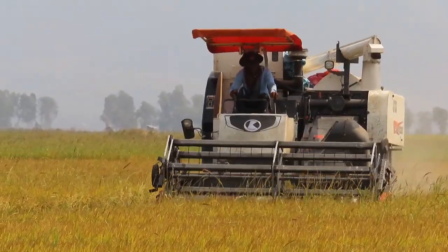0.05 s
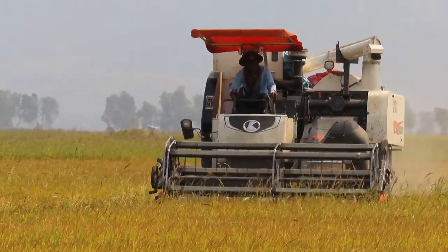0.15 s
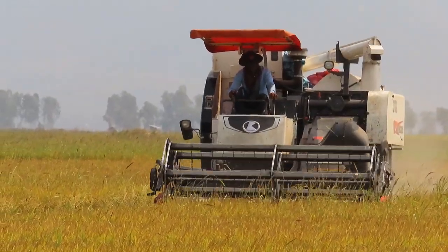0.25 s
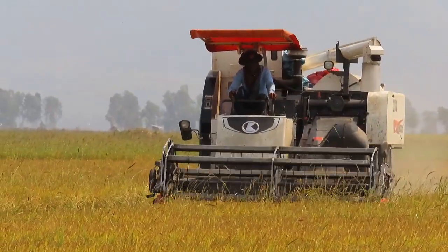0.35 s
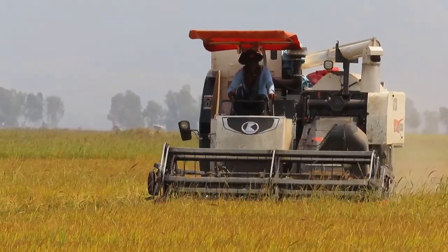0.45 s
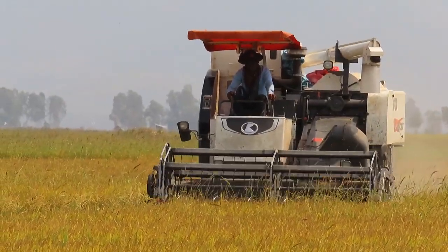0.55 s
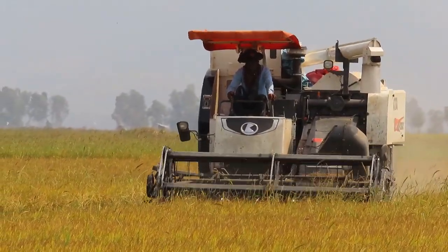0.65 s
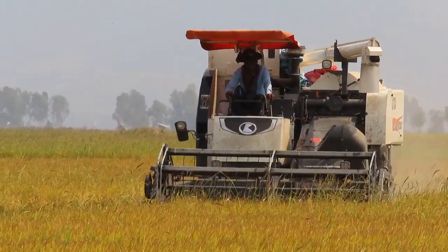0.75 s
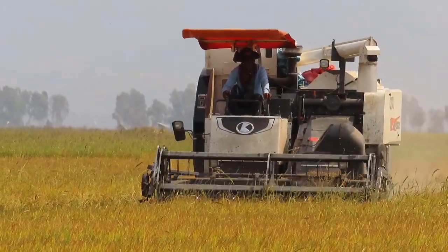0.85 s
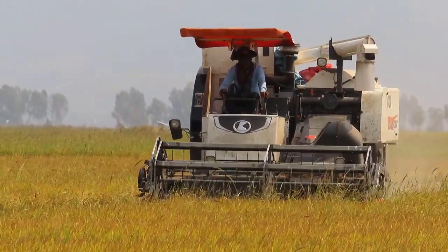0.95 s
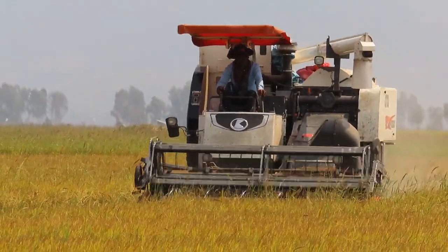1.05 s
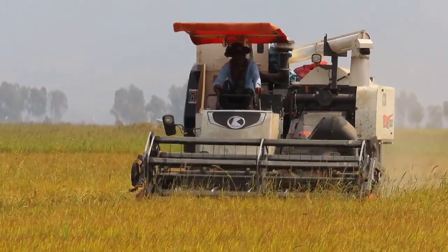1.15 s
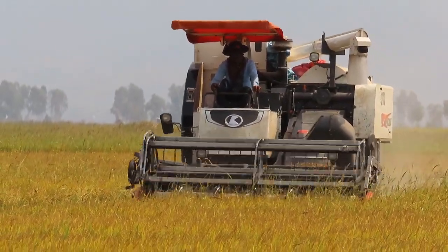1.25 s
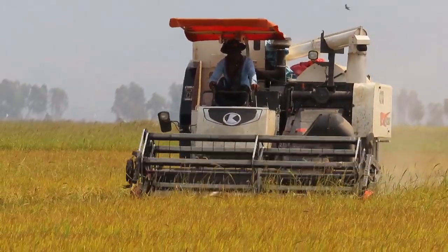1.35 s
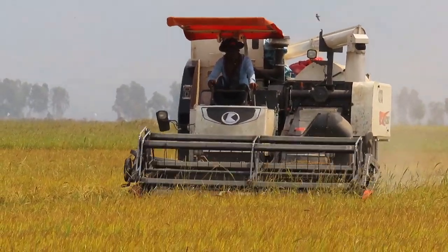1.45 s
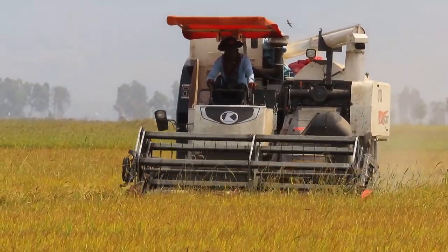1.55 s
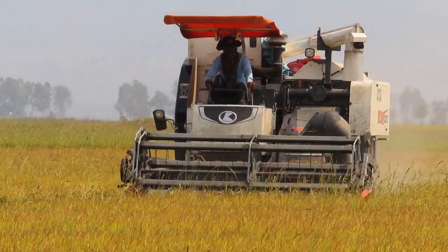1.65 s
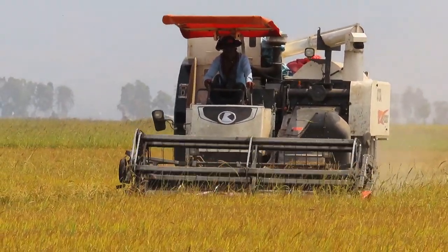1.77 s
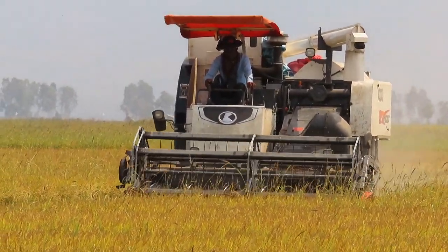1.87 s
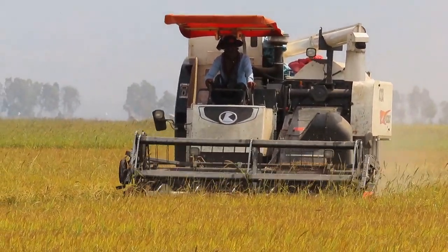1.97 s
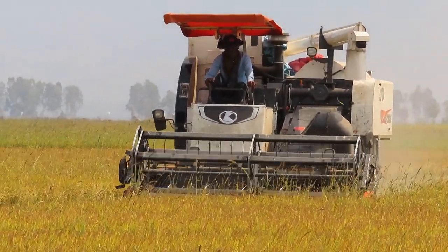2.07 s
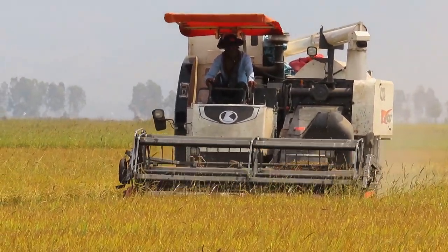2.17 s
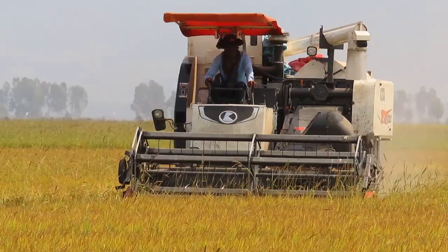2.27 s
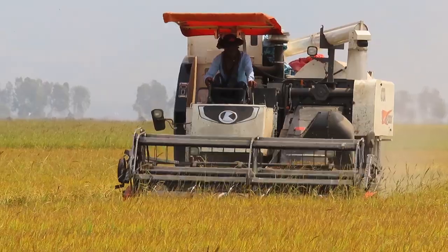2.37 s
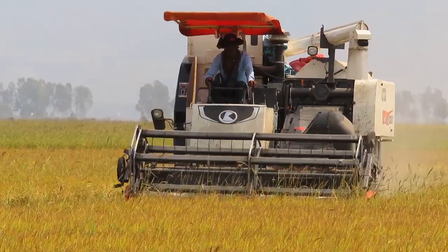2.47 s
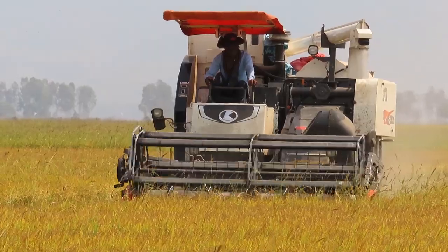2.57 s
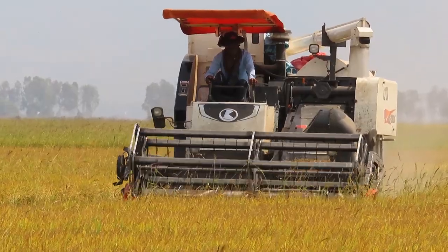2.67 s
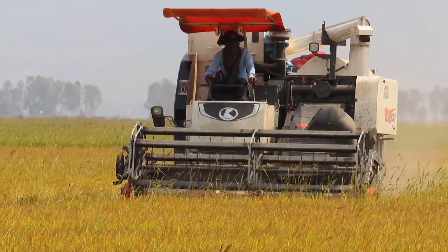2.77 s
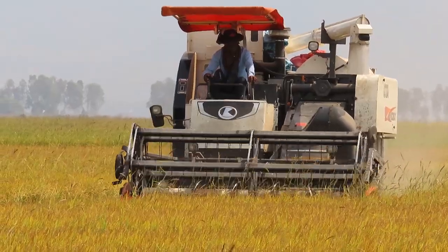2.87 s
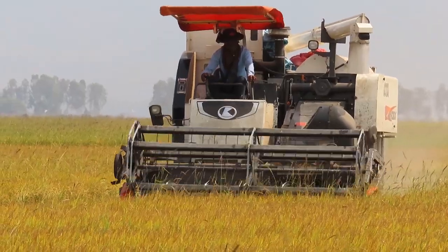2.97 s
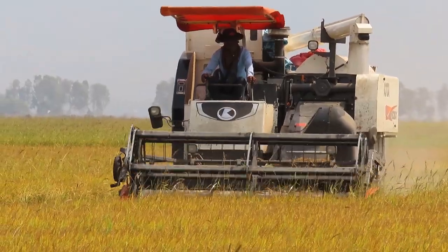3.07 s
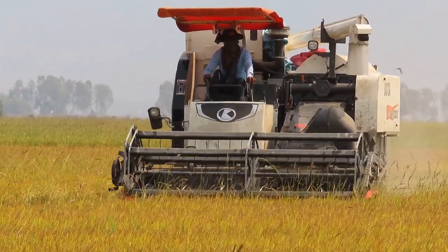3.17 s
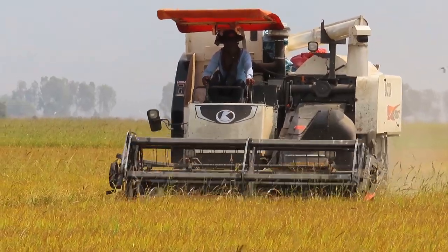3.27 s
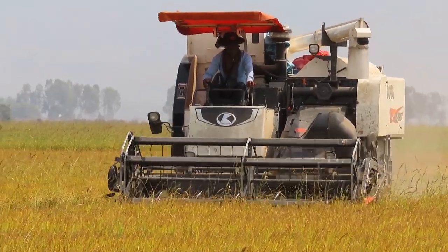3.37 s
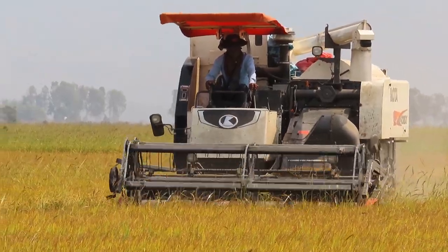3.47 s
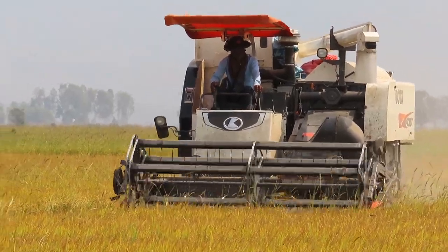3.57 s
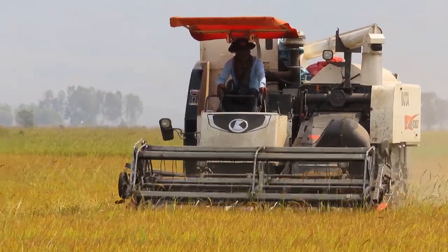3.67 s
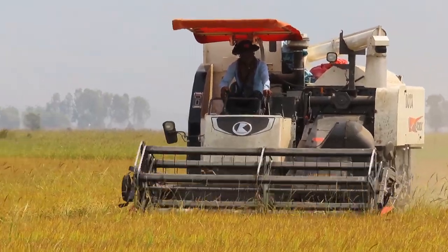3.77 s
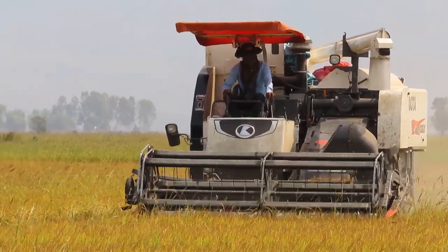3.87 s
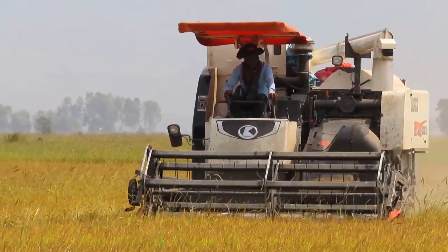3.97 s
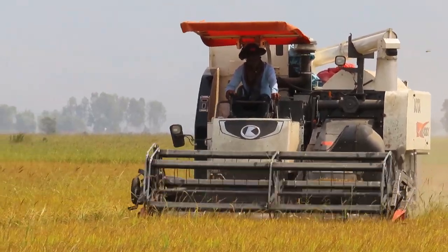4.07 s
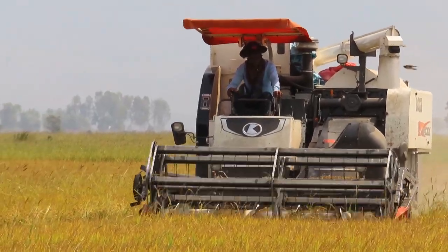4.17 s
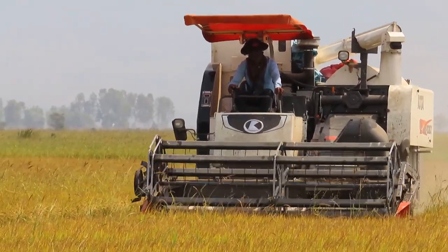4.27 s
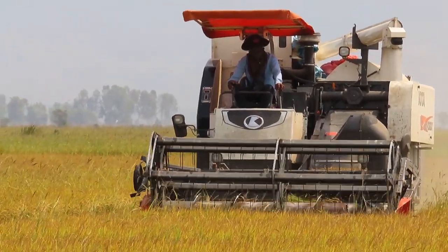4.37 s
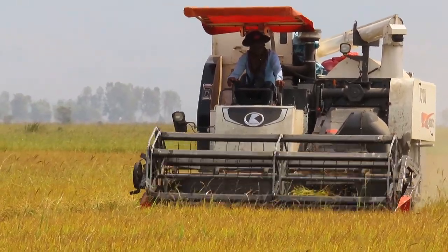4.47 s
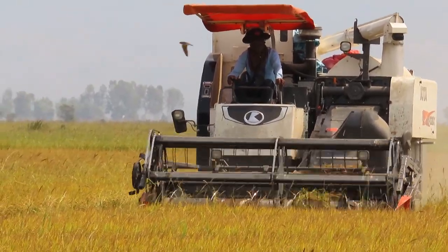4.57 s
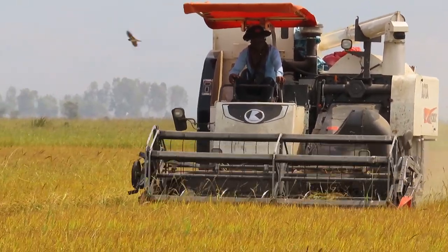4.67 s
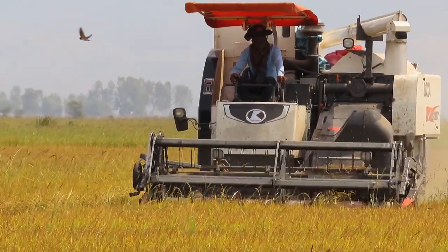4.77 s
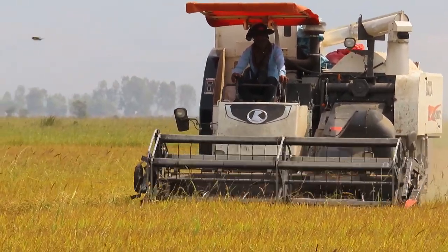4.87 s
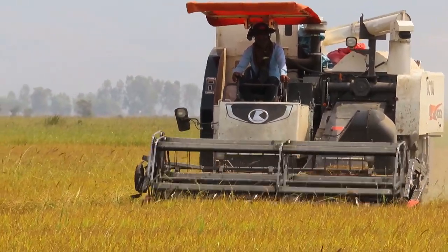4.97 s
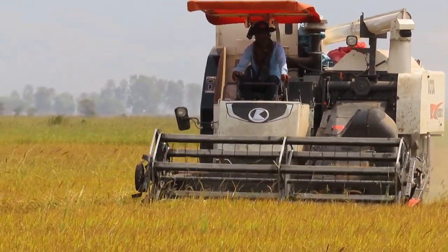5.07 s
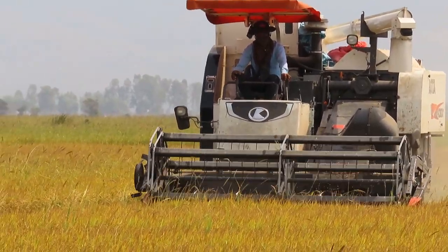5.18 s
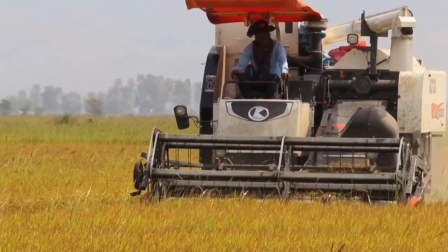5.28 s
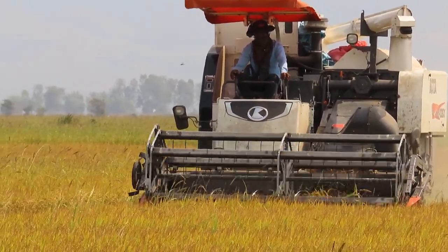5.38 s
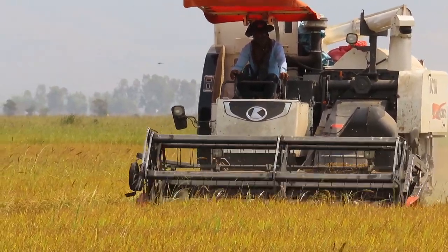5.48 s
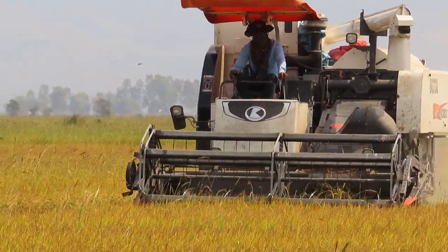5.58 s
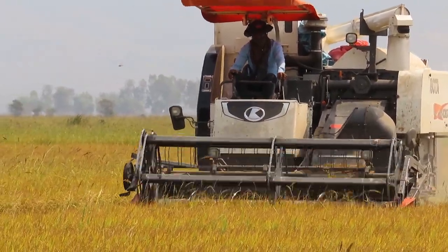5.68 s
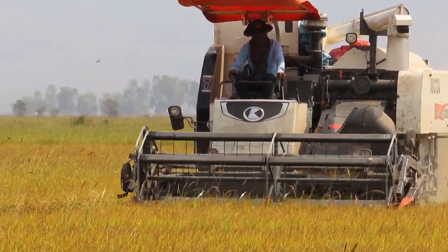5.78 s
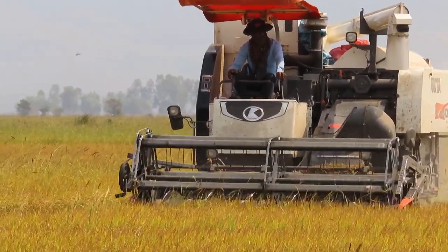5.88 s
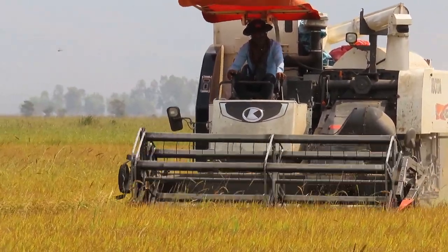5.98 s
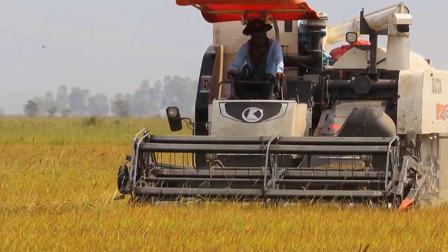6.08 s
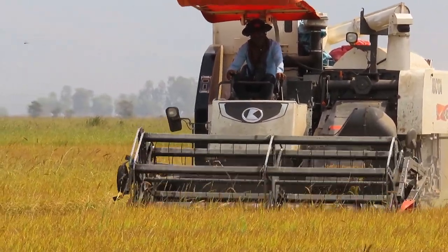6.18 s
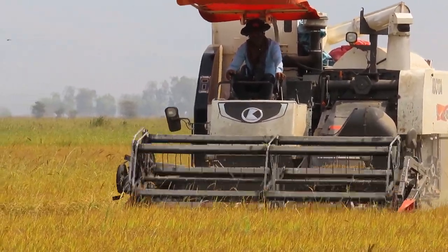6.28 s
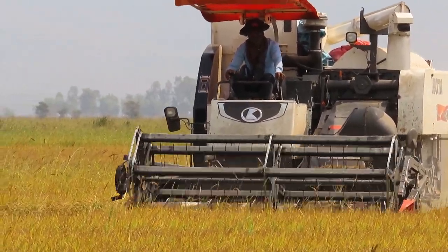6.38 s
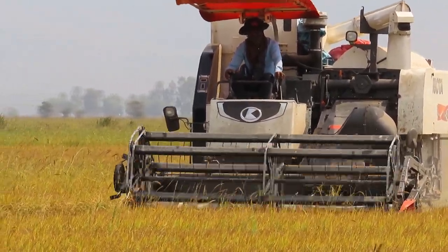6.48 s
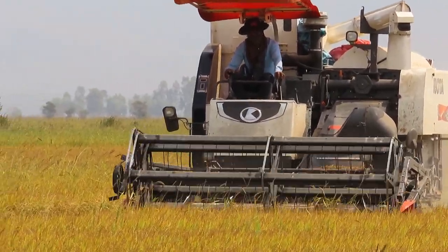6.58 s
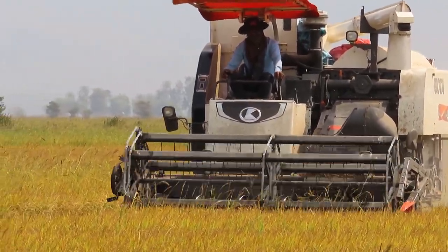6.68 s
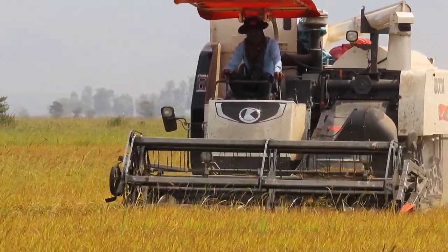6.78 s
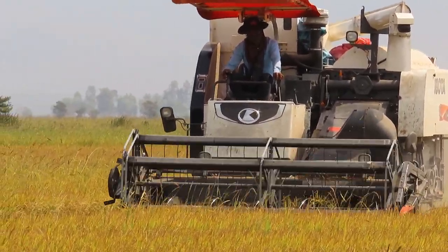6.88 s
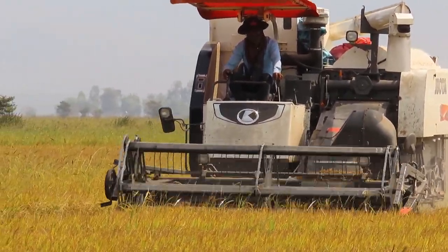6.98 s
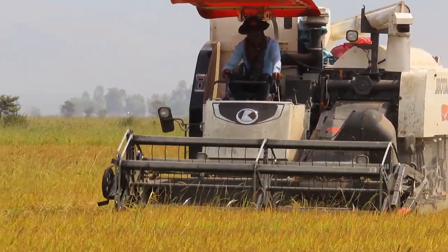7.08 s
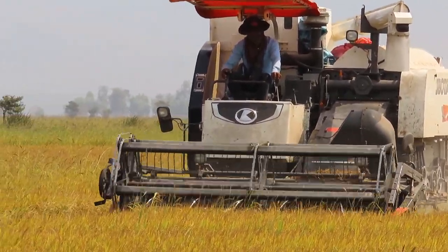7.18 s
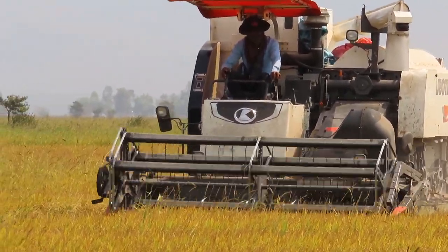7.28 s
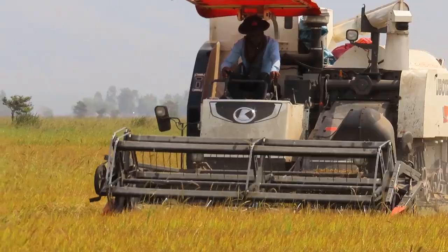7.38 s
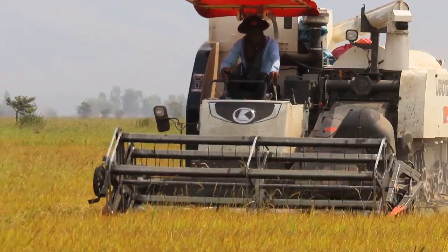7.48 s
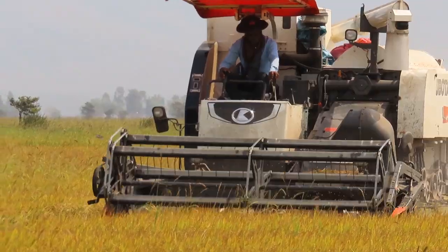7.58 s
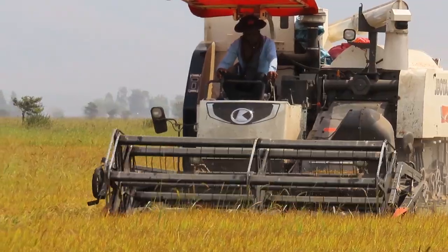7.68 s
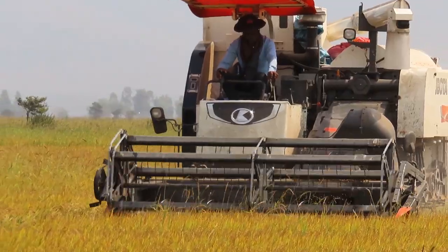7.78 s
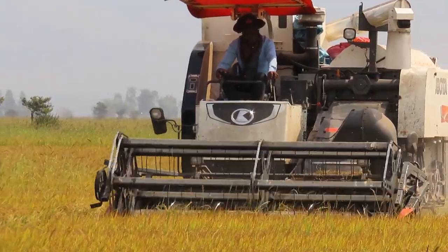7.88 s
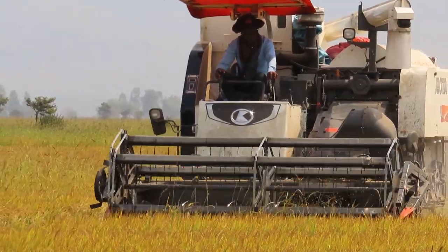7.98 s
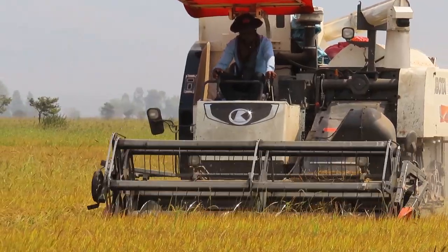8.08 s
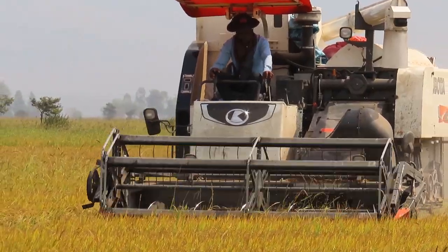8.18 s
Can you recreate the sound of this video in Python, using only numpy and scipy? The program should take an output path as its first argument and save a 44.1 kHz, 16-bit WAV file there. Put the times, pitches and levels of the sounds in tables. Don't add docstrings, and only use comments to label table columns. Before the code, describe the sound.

In an open crop field, a harvester is already running at 0 s, its diesel a steady low hum with fan tones and a soft hull rumble, with a few bassy jolts in the first half second. A small bird gives tiny high chips, each a tick and a falling note, about 0.2 s apart at first, then in spaced pairs to the end. Short belt squeaks appear near 1, 2 and 3.2 s. From 2.5 s the bass opens in small steps and drum rumble swells; by 3.5 s chains and cutting blades clatter nearer, and upper engine tones surge briefly around 4 s. After 5 s the rumble is heavier; loose sheet metal knocks irregularly, clustering after 7.4 s, with squeaks at 5.9, 6.5 and 7.9 s. Dry straw crackle and hiss thicken from 5.7 s, strongest near 7 s. Close camera microphones, mostly centred, slightly coloured; the machine continues to about 8 s.

```python
import sys
import numpy as np
from scipy import signal
from scipy.io import wavfile

SR = 44100
rng = np.random.default_rng(int(sys.argv[2]) if len(sys.argv) > 2 else 0)


def magnitude_from_level(level_db):
    exponent = np.asarray(level_db, float) / 20
    return 10 ** exponent


def put_to_file(sound):
    columns = np.atleast_2d(sound).T
    safe = np.clip(columns, -1, 1)
    whole_steps = np.round(safe * 32767)
    wavfile.write(sys.argv[1], SR, whole_steps.astype(np.int16))


N = 363384
TIME_S = np.arange(N) / SR

FIRING_HZ, KNIFE_STROKES_PER_S = 86.87, 13.1
# (multiple of firing rate [1], level re firing tone [dB])
ODD_ORDERS = [(.5, -33), (1.5, -15), (3, -16.5)]
# (multiple of firing rate [1], level re even level [dB])
EVEN_ORDERS = [(2, -12.), (6, -17.), (8, -24.)]
# (frequency [Hz], level re even level [dB])
FAN_TONES = [(177.4, -.5), (310, -13.), (354.8, -5), (474, -16.), (702, -24.), (1477, -34.)]
# (centre time [s], length [s], rise [dB])
SWELLS = [(1.05, .3, 3.), (3.65, .3, 9), (4.0, 0.47, 8.5), (5.3, .2, 2.5), (5.67, 0.18, 4), (7.45, .2, 3.)]

# (frequency [Hz], density [dB per Hz])
RUMBLE_SHAPE = [(22, -45), (45, -16.5), (72, -18), (110, -4.5), (200, 1), (330, 0), (420, -8)]
# (frequency [Hz], density [dB per Hz])
WORKS_SHAPE = [(400, 1), (540, -1), (720, -3.5), (1000, -10.5), (1500, -15.5), (2000, -23.5), (3200, -26)]
# (frequency [Hz], density [dB per Hz])
STRAW_SHAPE = [(3200, 1), (4200, -1), (5200, -7), (6500, -6.5), (8000, -10.5), (11000, -15), (15500, -23)]
# (centre time [s], length [s], rise [dB])
GUSTS = [(.07, .15, 16), (.27, .12, 8.), (.44, .14, 17), (1.5, .3, 7), (2.0, .3, 4.), (2.53, .1, 7.),
         (3.9, .2, 4.), (5.4, .4, 7), (5.92, .25, 6.), (6.6, .2, 3.), (7.23, .3, 4.), (7.623, .2, 13),
         (7.9, .15, 6), (8.15, .2, 3)]

# (note start time [s], level [dB], tick re note [dB], tick lead [ms], note length [ms])
CHIPS = [(0.246, -41, 3, 14, 12.9), (0.4117, -46, 5, 13, 15), (0.5866, -49, 4, 12, 14),
         (0.7728, -45, 4, 14.5, 12.0), (0.94, -46, 7, 13, 12), (1.147, -47, 3, 14.4, 11),
         (1.3313, -47.5, 6, 14, 11), (1.564, -45, 4, 13.9, 13.3), (2.083, -47, 6, 14.8, 12.7),
         (2.283, -44.5, 6, 14, 13.5), (2.8194, -44, 2, 15.3, 11.9), (3.0402, -45, 1, 14.9, 12.3),
         (3.6189, -47.5, 0, 14.9, 12.5), (3.835, -46.5, 2, 15.9, 9.5), (4.4304, -41, 3, 13, 14),
         (4.6531, -43.5, 1, 14.7, 12.1), (5.2345, -51, 1, 14.3, 14), (5.4549, -46.5, 0, 16.6, 10.3),
         (6.1044, -43.5, 2, 14.5, 13.4), (6.314, -43.5, 4, 14.5, 10), (6.9347, -46, -7, 17, 9.3),
         (7.1387, -48, -10, 15.8, 13.4), (7.7199, -47, 0, 14.6, 7.7)]
# (time [ms], frequency [Hz], level [dB])
TICK = [(-2.4, 4200, -24), (-1.8, 5300, -14), (-1.3, 6600, -6), (-.7, 7200, -1), (0, 7450, 0),
        (.9, 7050, -1.5), (1.5, 5900, -10), (2.2, 4600, -13), (3.8, 3900, -26)]
# (time [ms], frequency [Hz], level [dB])
UPSTROKE = [(-3.0, 4000, -24), (-2.0, 5000, -13), (-1.2, 6500, -8), (0, 8050, -5), (1.1, 7300, -5)]
# (time [s], left minus right [dB])
BIRD_PAN = [(0, 2), (2.3, 2.7), (3.2, .3), (5.3, -1.1), (8.24, -1.5)]
# (delay [s], level [dB])
BIRD_ECHOES = [(.018, -18.), (.026, -23.), (.038, -28.), (.057, -23.), (.071, -28.), (.088, -27.),
               (.11, -31.)]
NOTE_HZ = 6505
BIRD_LAG_MS = 0.034
TURN_DB_PER_S = 1.7

# (centre time [s], peak level [dB], frequency [Hz], length [ms])
SQUEAKS = [(2.0277, -42, 4400, 4.), (2.0408, -43, 4380, 9.1), (2.185, -51, 4400, 18),
           (1.075, -52, 2100, 14.), (1.925, -47, 2050, 12.), (3.222, -44, 2040, 18.),
           (5.855, -43, 4310, 9.9), (6.4612, -35.5, 4400, 9.2), (7.850, -38, 4430, 13)]
# (time [s], peak level [dB])
CLANKS = [(5.345, -35), (5.5, -35), (5.698, -27.5), (5.8502, -34), (6.0627, -46), (6.4598, -44),
          (6.6539, -44), (6.8627, -30), (7.432, -33), (7.7299, -40), (7.785, -30), (7.8447, -31.5),
          (7.9774, -30), (8.2074, -41)]
# (frequency [Hz], level [dB], decay by 60 dB [s])
SHEET_MODES = [(1300, 1, 0.033), (2070, 4, 0.017), (2800, 13, 0.008), (3640, 6, 0.021), (4300, 0, 0.017),
               (4960, -3, 0.015), (6500, -10, 0.0059)]

# (time [s], level [dB])
NEARNESS = [(0, -53), (.6, -50), (1.1, -46.5), (1.6, -50.5), (1.9, -49.5), (2.35, -50.5), (2.75, -47),
            (3.05, -46.5), (3.3, -43.5), (3.72, -41.5), (4.25, -43), (4.55, -41.5), (4.95, -42), (5.5, -39),
            (6.0, -40.5), (6.45, -38.5), (7.45, -38.5), (8.24, -40)]
# (time [s], level [dB])
FEED = [(0, -73), (.9, -73.5), (1.4, -71.5), (1.85, -67), (2.3, -71.5), (2.9, -75), (3.44, -67),
        (3.75, -70.5), (4.05, -69.5), (4.3, -69), (5.05, -69.5), (5.75, -61), (6.3, -63.5), (6.9, -58),
        (7.2, -57.5), (7.65, -60.5), (7.9, -60), (8.24, -61)]
# (time [s], level [dB])
LOAD = [(0, -32), (.6, -32), (1.3, -31.5), (2.45, -31), (2.62, -24), (2.8, -24), (2.95, -29.5),
        (3.55, -24.5), (3.85, -28), (4.45, -23.5), (4.9, -25.5), (5.1, -21.5), (5.45, -18.5), (6.3, -19.5),
        (6.85, -20), (7.25, -18), (7.78, -21), (8.24, -17.5)]
# (time [s], gain [dB])
BASS_STEPS = [(2.5, 6), (3.0, 0.62), (4.5, 4.), (5.0, 4), (6.0, 1.3), (7.0, 4)]
BASS_STEP_LENGTH_S = 0.035

# (level [dB], share of bass steps [dB/dB], of nearness [dB/dB], of feed [dB/dB], of load [dB/dB])
TONE, EVEN = (-41.5, 1.0145, 0.13, 0.05, 0.05), (-38, .5, -0.09, -0.0764, 0.4541)
HULL, LOW = (-26, 0.0476, 0.06, -0.0431, 0.83), (-36.5, 0.3953, -0.03, 0.08, 0.8245)
DEEP = (-58.5, 1.1275, -0.17, 0.21, 0.04)
CASING, CHAIN = (-36, 0.0889, 0.16, .02, 0.08), (-45.5, 0.0522, 0.69, 0.0556, -0.02)
GUARD, KNIFE = (-52.5, 0.0343, 1.63, 0.11, 0.05), (-50, 0.011, 0.83, 0.41, -0.07)
RUSTLE, HISS = (-56.5, 0.0659, 0.12, 0.86, .02), (-61, 0.03, -0.1, 1.22, -0.01)
EDGE = (-70, 0.04, 0, 1.16, -0.16)
UPPER = (-.1, -0.04, .4, .02, .02)

# (frequency [Hz], width [Hz], gain [dB])
HOUSING = [(407.6, 50, -8), (2210, 135, 4.5), (3313, 540, -9.5), (3770, 650, 3.5), (5800, 500, -7),
           (6400, 700, 0.5), (8370, 350, -12), (10700, 450, 0.5),
           (592, 110, -15.), (1060, 240, -15.), (4560, 200, -9.)]
# (frequency [Hz], density [dB per Hz])
SELF_NOISE = [(300, -24), (1000, -14), (2000, 16), (4000, 11), (6000, 0), (9000, 4.5), (15500, -18)]
# (edge [Hz], shift by bass [Hz/dB], shift by feed [Hz/dB])
WIDTH_LOW, WIDTH_HIGH, TOP = (1200, -57, 0), (16000, -400, 0), (15850, -90, 150)
WIDTH_LEAST_HZ = 9100


def rms_one(x):
    return x / np.sqrt(np.mean(x ** 2) + 1e-20)


def band_pass(x, low_hz, high_hz, order=2):
    return signal.sosfilt(signal.butter(order, [low_hz, high_hz], "band", fs=SR, output="sos"), x)


def in_time(rows):
    s, *columns = np.transpose(rows)
    return [np.interp(TIME_S, s, column) for column in columns]


def bumps(rows):
    return sum(db * np.exp(-(2 * (TIME_S - s) / length) ** 2) for s, length, db in rows)


def controls():
    bass = sum(db * np.clip((TIME_S - s) / BASS_STEP_LENGTH_S + .5, 0, 1) for s, db in BASS_STEPS)
    curves = [curve for rows in (NEARNESS, FEED, LOAD) for curve in in_time(rows)]
    return np.array([bass] + [curve - curve.mean() for curve in curves])


def levels(*parts):
    now = controls()
    return [db + np.array(shares) @ now for db, *shares in parts]


def drift(rate_hz):
    r = np.exp(-80 * np.pi * rate_hz / SR)
    slow = signal.lfilter([1], [1, -2 * r, r * r], rng.standard_normal(N // 40 + 2002))[2000:]
    return np.interp(np.arange(N) / 40, np.arange(len(slow)), rms_one(slow))


def grains(per_s, spread_db):
    sizes = magnitude_from_level(spread_db * np.minimum(rng.exponential(1, N), 4))
    signs = rng.choice([-1, 1], N)
    return rms_one(sizes * signs * (rng.random(N) < per_s / SR))


def ring(clicks, hz, t60_s):
    r, w = magnitude_from_level(-60 / (t60_s * SR)), 2 * np.pi * hz / SR
    return signal.lfilter([0, np.sin(w)], [1, -2 * r * np.cos(w), r * r], clicks + 1e-18)


def bank(shape, drive, splits_hz, levels_db, shared_db, patchy_db, count):
    hz, density_db = np.transpose(shape)
    edges = np.geomspace(hz[0], hz[-1], count + 1)
    together = drift(6.1)
    groups = np.zeros((len(levels_db), N))
    for k, (low, high) in enumerate(zip(edges, edges[1:])):
        band = band_pass(drive[k % 2], low, high)
        mid = np.sqrt(low * high)
        gain_db = np.interp(np.log(mid), np.log(hz), density_db)
        gain_db = gain_db + shared_db * together + patchy_db * drift(27.5)
        groups[np.searchsorted(splits_hz, mid)] += magnitude_from_level(gain_db) * band
    return sum(magnitude_from_level(db) * rms_one(group) for db, group in zip(levels_db, groups))


def diesel():
    tone_db, even_db, upper_db = levels(TONE, EVEN, UPPER)
    upper_db = upper_db + bumps(SWELLS) - 1.5
    turn = 2 * np.pi * np.cumsum(FIRING_HZ * (1 + 0.001514 * drift(1.525))) / SR
    out = magnitude_from_level(tone_db + 2.5 + 0.74 * drift(24.0)) * np.sin(turn)
    for orders, level_db in (ODD_ORDERS, tone_db), (EVEN_ORDERS, even_db):
        for order, db in orders:
            order_db = level_db + db + (order > 4) * upper_db + 5.5 + 3.1 * drift(10.4)
            out += magnitude_from_level(order_db) * np.sin(order * turn + 0.3 * drift(1.7) + rng.uniform(0, 6.72))
    for hz, db in FAN_TONES:
        fan_db = even_db + db + (hz > 400) * upper_db + 2.6 + 3 * drift(5.0)
        out += magnitude_from_level(fan_db) * np.sin(turn * hz / FIRING_HZ + .55 * drift(4.0))
    return out


def rumble():
    hull_db, low_db, deep_db = levels(HULL, LOW, DEEP)
    levels_db = deep_db + bumps(GUSTS), low_db + 2.4, hull_db - .8
    return bank(RUMBLE_SHAPE, rng.standard_normal((2, N)), [85, 185], levels_db, 0.83, 0.22, count=11)


def works():
    casing_db, chain_db, guard_db, knife_db = levels(CASING, CHAIN, GUARD, KNIFE)
    stroke = magnitude_from_level(.75 * np.sin(2 * np.pi * KNIFE_STROKES_PER_S * TIME_S + .8 * drift(1.5)))
    drive = [stroke * (rng.standard_normal(N) + 0.38 * grains(1500., 2.2)) for _ in range(2)]
    levels_db = casing_db + 0.5, chain_db + 3.5, guard_db + 0.25, knife_db - .6
    roar = bank(WORKS_SHAPE, drive, [1050, 1560, 1900], levels_db, 0.74, 1.27, count=14)
    taps = grains(200., 1.6) * magnitude_from_level(1.2 * drift(3.0))
    dealt = rng.integers(0, 20, N)
    links = np.zeros(N)
    for k, hz in enumerate(np.geomspace(750, 4300, 20)):
        links += ring(taps * (dealt == k), hz, 70. / hz) * (750 / hz) ** .9
    return roar + magnitude_from_level(chain_db - 7) * rms_one(links)


def straw():
    rustle_db, hiss_db, edge_db = levels(RUSTLE, HISS, EDGE)
    drive = [1.2 * rng.standard_normal(N) + 0.29 * grains(3000., 4.6) for _ in range(2)]
    levels_db = rustle_db + 0.5, hiss_db + 2.0, edge_db + .8
    stalks = bank(STRAW_SHAPE, drive, [5800, 8800], levels_db, 0.45, 1.1, count=11)
    return magnitude_from_level(0.55 * drift(18.0)) * stalks


def whistle(shape, lag_ms):
    ms, hz, db = np.transpose(shape)
    t = np.arange(round(.025 * SR)) * 1000 / SR - 4
    turn = 2 * np.pi * np.cumsum(np.interp(t, ms, hz)) / SR
    heard = t - lag_ms
    inside = (heard > ms[0]) & (heard < ms[-1])
    return inside * magnitude_from_level(np.interp(heard, ms, db)) * np.sin(np.interp(heard, t, turn))


def bird():
    out = np.zeros((2, N))
    for s, db, tick_db, lead_ms, ms in CHIPS:
        hz = NOTE_HZ * (1 + 0.0053 * rng.standard_normal())
        upstroke = [(a, b, c - TURN_DB_PER_S * s) for a, b, c in UPSTROKE]
        fall = [(2.2, hz * 1.04, -1.5), (4, hz * 1.012, 0), (.6 * ms, hz * .99, -2.5),
                (ms - 1.5, hz * .97, -4), (ms + 1.5, hz * .966, -24)]
        tick_part = TICK, s - lead_ms / 1000, db + tick_db - 3.5
        note_part = upstroke + fall, s, db
        for side, lag_ms in enumerate((BIRD_LAG_MS, 0)):
            for shape, start_s, level_db in (tick_part, note_part):
                sound = whistle(shape, lag_ms)
                at = round((start_s - .004) * SR)
                out[side, at:at + len(sound)] += magnitude_from_level(level_db + 6.5) * sound
    dull = band_pass(out, 6100, 6900)
    out += sum(magnitude_from_level(db) * np.roll(dull, round(s * SR), axis=1) for s, db in BIRD_ECHOES)
    pan_db, = in_time(BIRD_PAN)
    return out * magnitude_from_level(np.outer([.5, -.5], pan_db))


def squeaks():
    out = np.zeros(N)
    for s, db, hz, ms in SQUEAKS:
        swell = np.hanning(round(ms * 1.4 * SR / 1000))
        turn = 2 * np.pi * hz * np.arange(len(swell)) / SR
        at = round(s * SR) - len(swell) // 2
        out[at:at + len(swell)] += magnitude_from_level(db) * swell * (np.sin(turn) + magnitude_from_level(-15.5) * np.sin(2 * turn))
    return out


def clanks():
    at = [round(s * SR) for s, db in CLANKS]
    knock_db = np.array(CLANKS)[:, 1]
    sheet, shakes = np.zeros(N), np.zeros(N)
    for hz, mode_db, t60_s in SHEET_MODES:
        clicks = np.zeros(N)
        clicks[at] = magnitude_from_level(knock_db + mode_db - 14 + rng.normal(0, 2, len(at)))
        sheet += ring(clicks, hz, t60_s)
    shakes[at] = magnitude_from_level(knock_db - 13.5)
    puff = signal.lfilter([1], [1, -magnitude_from_level(-60 / (.11 * SR))], shakes + 1e-18)
    chaff = band_pass(rng.standard_normal(N), 2600, 7500)
    knocks = sheet + puff * rms_one(chaff)
    return signal.sosfilt(signal.butter(4, 7500, fs=SR, output="sos"), knocks)


def housing(x):
    for hz, width_hz, db in HOUSING:
        r = np.exp(-np.pi * width_hz / SR)
        top = (1 - r * r) / 2 * np.array([1, 0, -1])
        bottom = [1, -(1 + r * r) * np.cos(2 * np.pi * hz / SR), r * r]
        x = x + (magnitude_from_level(db) - 1) * signal.lfilter(top, bottom, x)
    return x


def capsule_hiss():
    return bank(SELF_NOISE, rng.standard_normal((2, N)), [3000], (-61.5, -62.5), 0, 0, count=8)


def narrow(x):
    hz, s, both = signal.stft([x[0] + x[1], x[0] - x[1]], SR, nperseg=2048)
    frames, rows = len(s), hz[:, None]
    now = controls()[::2, np.minimum(s * SR, N - 1).astype(int)]
    low_hz, high_hz, top_hz = [edge + np.array(moves) @ now for edge, *moves in (WIDTH_LOW, WIDTH_HIGH, TOP)]
    wobble = 2 ** (rng.standard_normal((2, frames)) * [[.22], [.07]])
    keep = np.ones(both.shape, bool)
    keep[1] = (rows > low_hz * wobble[0]) & (rows < np.maximum(high_hz * wobble[1], WIDTH_LEAST_HZ))
    for low in np.arange(3100, 8200, 460):
        band = (hz >= low) & (hz < low + 460)
        mid, side = np.sqrt(np.mean(abs(both[:, band]) ** 2, axis=1))
        keep[1, band] &= side > magnitude_from_level(-17.0 + 2.5 * rng.standard_normal(frames)) * mid
    ragged = top_hz + 320 * rng.standard_normal(frames)
    keep &= rows < ragged // 345 * 345 + 170
    odds = .3 * np.exp((rows - ragged) / [[[1500]], [[3000]]])
    keep &= np.repeat(rng.random((2, 129, frames)), 8, axis=1)[:, :len(hz)] > odds
    mid, side = signal.istft(both * ~keep, SR, nperseg=2048)[1][:, :N] / 2
    return x - mid - side * [[1], [-1]]


def scene():
    machine = housing(diesel() + rumble() + works() + straw() + clanks()) + squeaks()
    late = np.pad(machine, (round(.031 * SR), 0))[:N]
    scattered = magnitude_from_level(-20.0) * band_pass(late, 900, 3000, order=1) + magnitude_from_level(-37) * late
    return machine + scattered * [[1], [-1]] + bird()


def top_cut(x):
    return signal.sosfilt(signal.butter(12, 15610, fs=SR, output="sos"), x)


def record(dry):
    hiss = np.array([capsule_hiss(), capsule_hiss()])
    return top_cut(narrow(dry + hiss))


dry = scene()
out = record(dry)
put_to_file(out)
```